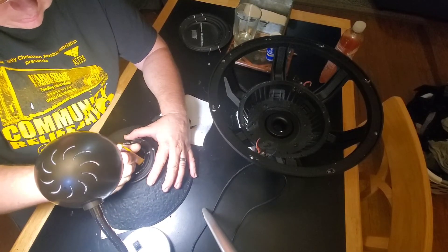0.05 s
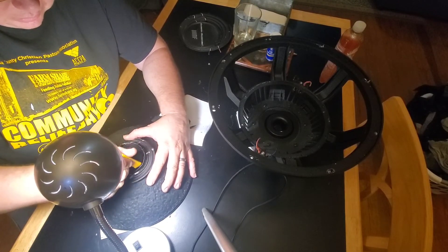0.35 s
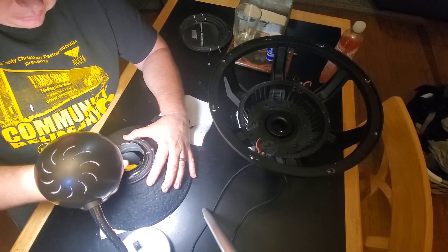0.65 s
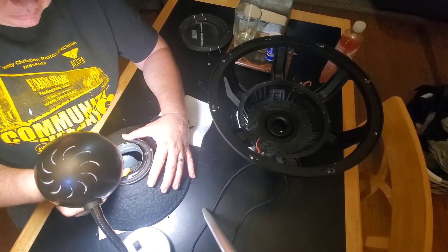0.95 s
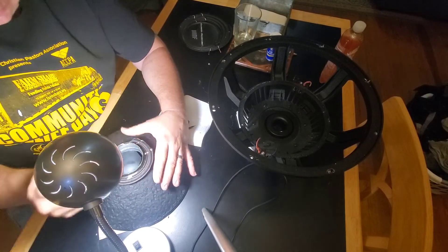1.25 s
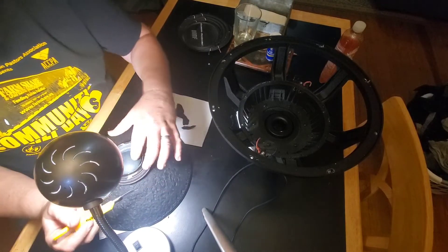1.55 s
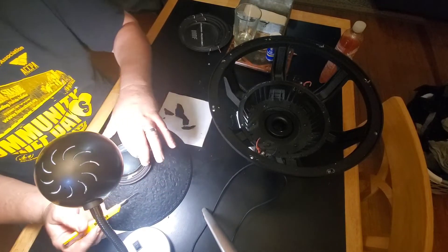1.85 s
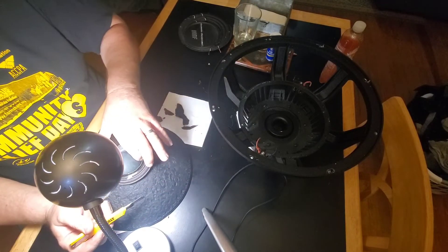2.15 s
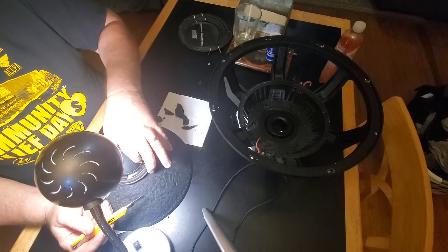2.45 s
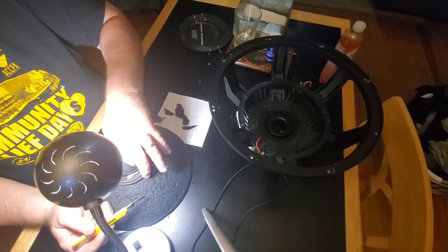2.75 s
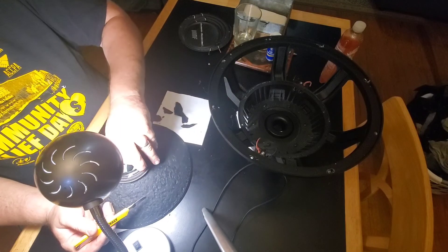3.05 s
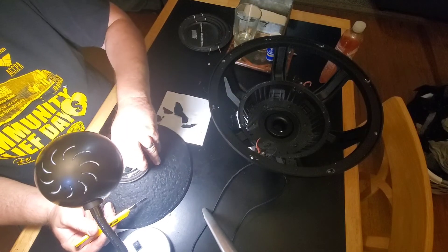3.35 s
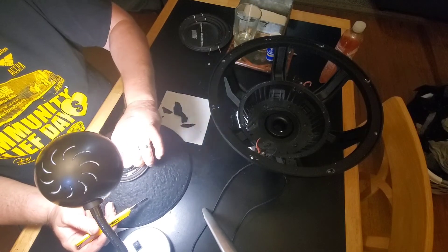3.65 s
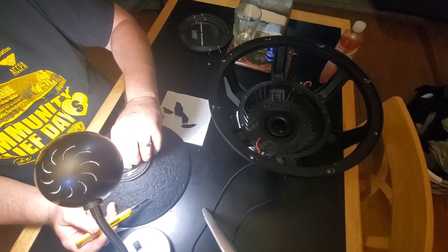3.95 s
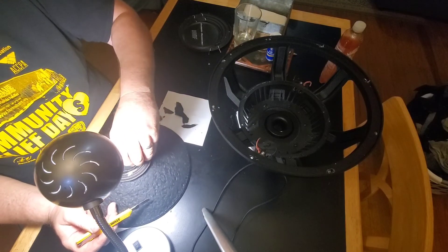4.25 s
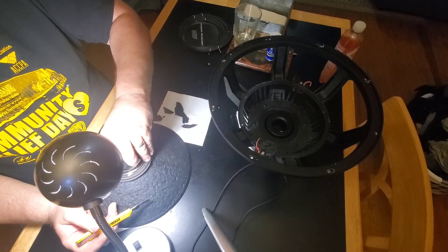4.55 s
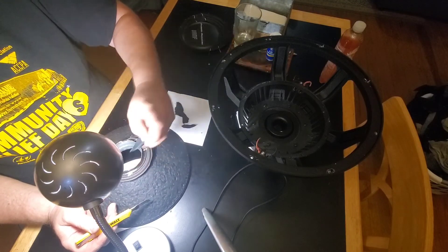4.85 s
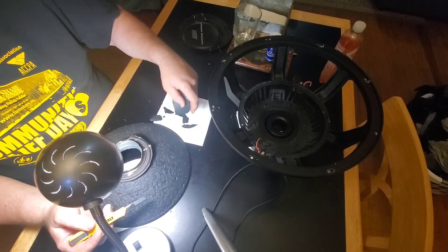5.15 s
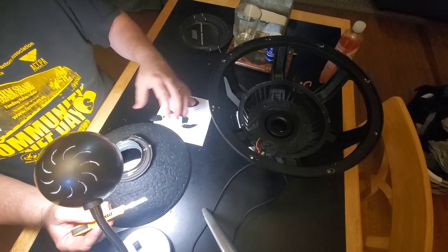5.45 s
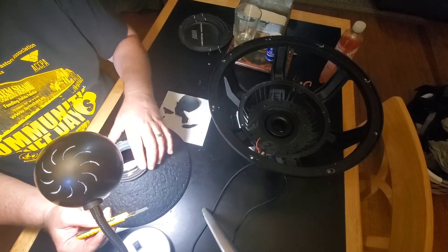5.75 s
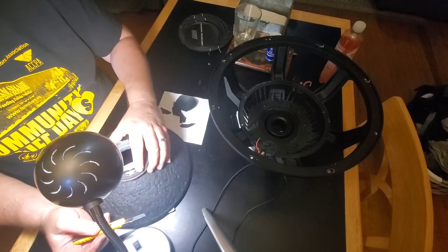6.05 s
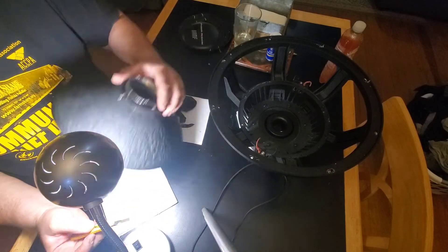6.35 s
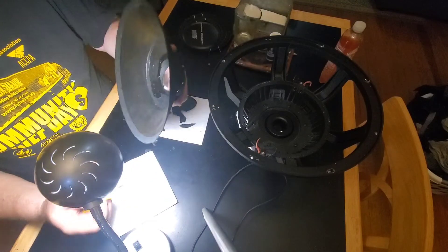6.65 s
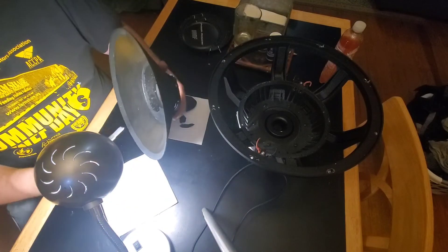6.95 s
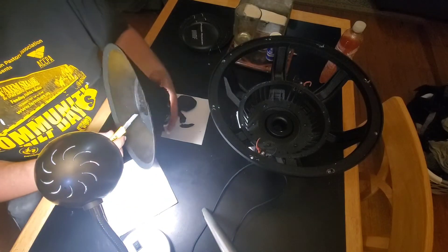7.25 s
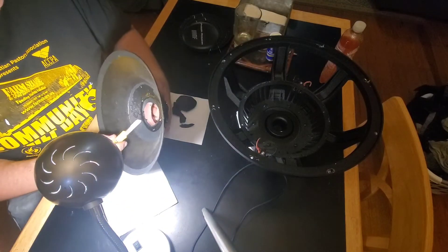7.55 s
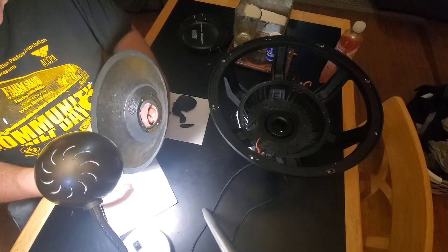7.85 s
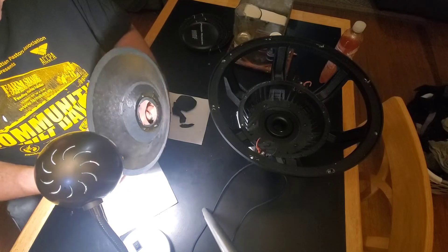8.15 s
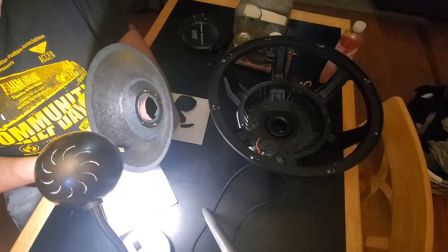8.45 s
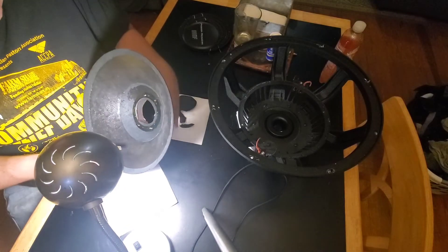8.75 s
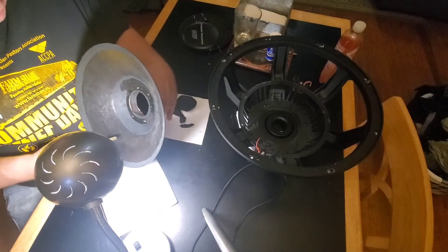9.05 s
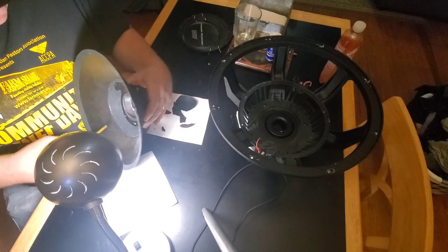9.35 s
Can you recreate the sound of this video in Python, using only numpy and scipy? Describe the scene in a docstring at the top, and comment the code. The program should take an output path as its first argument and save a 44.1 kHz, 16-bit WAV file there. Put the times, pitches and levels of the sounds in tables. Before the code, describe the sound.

A paper speaker cone is picked, rubbed and scratched by hand on a table, ending with a few light taps.

```python
"""A loose paper speaker cone is worked on by hand at a table, over the low rumble of a small room. First it
lies face down and is cut, picked and rubbed: stick-slip friction and sharp catches drive its hollow low body,
rasping upper modes and hissing fibres, with brief squeaks and thumps on the table. Near six seconds it is
lifted and scratched, and rings higher; for a moment its rim rests on the table. It ends with four light,
pitched taps as the tilted cone's rim knocks on the table."""
import sys
import numpy as np
from scipy import signal
from scipy.fft import rfft, irfft
from scipy.io import wavfile
from scipy.ndimage import uniform_filter1d

SR = 44100
rng = np.random.default_rng(int(sys.argv[2]) if len(sys.argv) > 2 else 0)


def materialize(psi):
    """Save the field psi as 16-bit PCM at rate SR to the path in sys.argv[1].

    A 1-D psi becomes a single channel; in a 2-D psi each row is a channel.
    """
    bounded = np.clip(np.atleast_2d(psi).T, -1, 1)
    quanta = np.round(bounded * 32767).astype(np.int16)
    wavfile.write(sys.argv[1], SR, quanta)


N = 423360
TIME = np.arange(N) / SR
FILTER_SIZE = 8192
HZ = np.maximum(np.fft.rfftfreq(FILTER_SIZE, 1 / SR), 1)
LIFT_S = 5.85   # the cone leaves the table
BODY, RASP, FIBRES = 0, 1, 2   # the cone's low, middle and high registers

# Broad tone of the cone pressed under the blade, lying under the fingers, held in the air,
# and tilted with its rim on the table: frequency_hz, level_db
PRESSED = [(150, -10), (250, -4.5), (450, -1.5), (650, -12), (1000, -15), (1600, -16.5), (2700, -18),
           (4000, -21.5), (7500, -28.5), (15500, -31.5)]
RUBBED = [(200, -6), (440, -3.5), (630, -12), (820, -15), (1150, -12.5), (1900, -13), (2500, -18.5),
          (6500, -16), (10500, -16), (15500, -19.5)]
LIFTED = [(150, -16), (300, -13), (600, -9), (1000, -1), (1500, -2.5), (1850, -2.5), (2450, -14),
          (3400, -13), (5500, -19), (7500, -26.5), (15500, -23.5)]
TILTED = [(150, -5.5), (620, -3), (820, -2.5), (1500, -2.5), (3600, -11), (5500, -23.5), (9000, -30)]
# Resonances on top of those four tones: pitch_hz, width_hz, boost_db
PRESSED_MODES = [(258, 110, 10), (340, 33, 3.9), (524, 23, 6.6), (907, 43, 7.6), (3644, 300, 3.7),
                 (9700, 230, 1.3)]
RUBBED_MODES = [(369.5, 22, 4), (477, 67, 3.6), (967, 150, 5.6), (2830, 530, 2), (3710, 1000, 7.1)]
LIFTED_MODES = [(433, 52, 6.4), (709, 51, 2.9), (1305, 110, 5.5), (1470, 72, 10.2), (2850, 255, 10.9),
                (3670, 230, 8.7)]
TILTED_MODES = [(549, 21, 3.7), (1040, 210, 7), (2030, 330, 6), (2720, 120, 11)]
# Dull bumps of hand and cone on the table: start_s, level_db, hardness_db_per_octave
BUMPS = [(0.181, -34.5, -7), (0.241, -48, -7), (0.757, -52.5, 10.5), (1.053, -46.5, 1), (1.365, -54.5, 7),
         (3.794, -45.5, -6.5), (4.623, -46, -1), (6.556, -56, 13), (6.717, -49, 3.5), (9.405, -46, -5.5)]
BUMP_PIVOT_HZ = 100   # hardness tilts a bump's spectrum about this pitch


def from_db(db):
    """Decibels to gain."""
    return 10 ** (np.asarray(db) / 20)


def unit_energy(x):
    """Scale so that the squares sum to one."""
    return x / np.sqrt(np.sum(x ** 2, axis=-1, keepdims=True) + 1e-20)


def colour(points):
    """An EQ curve in dB, drawn through a few points."""
    hz, db = np.transpose(points)
    return np.interp(np.log(HZ), np.log(hz), db)


def causal(db):
    """Minimum-phase impulse response of an EQ curve: nothing rings before the blow."""
    cepstrum = irfft(np.log(from_db(db) + 1e-6))
    cepstrum[1:FILTER_SIZE // 2] *= 2
    cepstrum[FILTER_SIZE // 2 + 1:] = 0
    return irfft(np.exp(rfft(cepstrum)))


def through(x, response):
    """Pass a sound through an impulse response."""
    return signal.fftconvolve(x, response)[:N]


def drift(rate_hz):
    """A random wander with a spread of about one."""
    return np.interp(TIME * rate_hz, np.arange(N // 20), rng.standard_normal(N // 20))


def diffuse(size, port_span_s=0.00057):
    """Noise from all sides at two microphone ports: alike in the bass, unrelated in the treble."""
    left, other = rfft(rng.standard_normal((2, size)))
    alike = np.sinc(2 * np.fft.rfftfreq(size, 1 / SR) * port_span_s)
    return irfft([left, alike * left + np.sqrt(1 - alike ** 2) * other], size)


def room_tone(rumble_trim_db, air_db, own_share):
    """Low rumble and the faint hiss of a quiet room, each partly different at the two ports."""
    # Rise and fall of the rumble: time_s, level_db
    rumble_levels = [(0.0, -54.5), (2.35, -72.5), (4.04, -66), (6.44, -74), (6.71, -65.5), (7.11, -78.5),
                     (7.94, -65.5), (9.01, -72), (9.6, -58)]
    # Tone of the rumble and of the hiss: frequency_hz, level_db
    rumble_colour = [(20, -19), (35, -9.5), (50, 1), (65, 0), (85, -18), (117, -7.5), (165, -14.5),
                     (210, -24.5), (400, -47)]
    air_colour = [(150, -9.5), (346, -15), (860, -14.5), (1940, -22.5), (5000, -30), (6500, -23),
                  (7600, -32.5), (12000, -26.5)]

    def noise(points):
        white = (diffuse(N) + own_share * rng.standard_normal((2, N))) / np.hypot(1, own_share)
        return np.array([through(side, unit_energy(causal(colour(points)))) for side in white])
    rumble_db = np.interp(TIME, *np.transpose(rumble_levels)) + rumble_trim_db
    return from_db(rumble_db) * noise(rumble_colour) + from_db(air_db) * noise(air_colour)


def slips(per_s, spread_db, smooth):
    """Stick-slip force: tiny uneven releases over smooth friction, held at steady power by the push."""
    sizes = from_db(spread_db * np.minimum(rng.exponential(1, N), 4)) * rng.choice([-1, 1], N)
    grains = unit_energy(sizes * (rng.random(N) < per_s / SR)) * np.sqrt(N)
    force = np.sqrt(1 - smooth) * grains + np.sqrt(smooth) * rng.standard_normal(N)
    return force / np.sqrt(uniform_filter1d(force ** 2, size=1024) + 1e-6)


def strokes(register, edge_db=11, flatness=1.6):
    """Rubbing envelope: each stroke speeds up and slows down over the touch of the resting hand."""
    # Finger or blade slides over the paper: middle_s, length_s, body_db, rasp_db, fibres_db
    slides = [(0.004, 0.011, -26.5, -37, -42), (0.06, 0.063, -35, -42.5, -44.5),
              (0.413, 0.029, -43, -53.5, -54.5), (0.578, 0.029, -43.5, -51, -51),
              (0.656, 0.01, -55, -68, -56), (1.534, 0.21, -71, -70.5, -76), (1.939, 0.16, -58.5, -81, -76),
              (2.561, 0.044, -67, -67.5, -62.5), (2.615, 0.55, -70.5, -81.5, -72),
              (2.803, 0.029, -59.5, -61, -66), (2.858, 0.1, -69, -64.5, -58.5),
              (2.93, 0.028, -61.5, -58, -73), (3.11, 0.073, -77, -61.5, -71.5),
              (3.205, 0.056, -57, -58.5, -51), (3.425, 0.047, -62, -61.5, -66),
              (3.513, 0.058, -62, -59.5, -69), (3.612, 0.051, -50, -53, -70),
              (3.787, 0.013, -66, -47.5, -55), (3.842, 0.058, -48, -59, -48.5),
              (3.991, 0.085, -55, -58, -54.5), (4.097, 0.1, -54, -65, -66),
              (4.16, 0.062, -50.5, -52, -56.5), (4.353, 0.09, -61.5, -76, -65),
              (4.496, 0.095, -50.5, -64.5, -56), (4.646, 0.084, -53, -53, -50.5),
              (4.834, 0.23, -77.5, -93, -61.5), (5.111, 0.071, -80.5, -80.5, -69),
              (5.35, 0.11, -77, -83, -71), (5.934, 0.056, -60.5, -61, -71),
              (6.078, 0.11, -62.5, -66, -70.5), (6.23, 0.067, -72, -56, -67),
              (7.229, 0.067, -83.5, -63.5, -72), (7.543, 0.06, -78.5, -57.5, -64),
              (7.786, 0.062, -90, -51.5, -54), (8.157, 0.041, -52, -59, -53), (8.287, 0.057, -63, -78, -71),
              (8.409, 0.052, -74, -65, -71), (8.784, 0.11, -88, -62, -58), (8.831, 0.047, -74, -58, -85),
              (8.924, 0.062, -78, -56, -59.5)]
    # The hand resting on the cone between strokes: time_s, level_db
    resting = [(0, -46.5), (.4, -55), (.68, -87), (.98, -59), (1.3, -75), (2.3, -81), (3.3, -70),
               (3.85, -67.5), (4.35, -81), (5.8, -92), (6.75, -81.5), (7.05, -96), (8.3, -74.5),
               (9.1, -81.5), (9.6, -62)]
    lying_db, lifted_db = (1.5, -5, -9), (-5, 1.5, -6)   # its share in body, rasp and fibres
    touch_db = np.where(TIME < LIFT_S, lying_db[register], lifted_db[register])
    power = from_db(np.interp(TIME, *np.transpose(resting)) + touch_db) ** 2
    for middle, length, *levels in slides:
        span = slice(*np.searchsorted(TIME, [middle - 2 * length, middle + 2 * length]))
        from_middle = np.abs(TIME[span] - middle) / (length / 2)
        power[span] += from_db(levels[register] - edge_db * from_middle ** flatness) ** 2
    return np.sqrt(power)


def cone_response(broad, modes, ring, sheen_db, low_hz, high_hz):
    """Ring of the paper cone within one band, with unit energy."""
    peaks = ring * sum(db / (1 + (2 * (HZ - hz) / width) ** 2) for hz, width, db in modes)
    sheen = sheen_db / (1 + (7400 / HZ) ** 4)   # high shelf: the hiss of the finest fibres
    edges = -10 * np.log10((1 + (low_hz / HZ) ** 14) * (1 + (HZ / high_hz) ** 14))
    return unit_energy(causal(colour(broad) + peaks + sheen + edges))


def cone(register, friction, crumble, rub_db, catch_db, snap_s):
    """Strokes and catches drive one register of the cone, whose modes change with the way it is held."""
    # How it is held: start_s, tone, resonances, ring_share left by the hand, low_cut_hz, sheen_db
    holds = [(0, PRESSED, PRESSED_MODES, 1, 190, 0), (.6, PRESSED, PRESSED_MODES, 1, 300, 2.5),
             (1.2, PRESSED, PRESSED_MODES, 1, 270, 0), (1.3, RUBBED, RUBBED_MODES, 1, 160, -2),
             (3.7, RUBBED, RUBBED_MODES, 1, 230, 4), (4.95, PRESSED, PRESSED_MODES, 1, 150, 8),
             (LIFT_S, LIFTED, LIFTED_MODES, .8, 130, 3), (6.45, TILTED, TILTED_MODES, 1, 130, 1),
             (7.1, LIFTED, LIFTED_MODES, 1, 240, 1.5)]
    low_hz, high_hz = [(0, 700), (700, 2800), (2800, SR / 2)][register]
    force = from_db(rub_db) * friction * strokes(register)
    force += from_db(catch_db) * catches(register, crumble, snap_s)
    current_hold = np.searchsorted([row[0] for row in holds], TIME, side="right") - 1
    out = np.zeros(N)
    for k, (_, broad, modes, ring, low_cut_hz, sheen_db) in enumerate(holds):
        response = cone_response(broad, modes, ring, sheen_db, max(low_hz, low_cut_hz), high_hz)
        out += through(force * (current_hold == k), response)
    return out


def moving_contact(x, patchy_db, spots=6):
    """The finger travels over the cone, and each spot favours other modes."""
    knots = np.log(np.geomspace(500, SR / 2, num=40))
    position = np.cumsum(8 + 2 * drift(rate_hz=2)) / SR   # about eight spots a second
    out = 0
    for k in range(spots):
        nearness = np.maximum(1 - np.abs((position - k) % spots - spots / 2), 0)
        favour_db = patchy_db * np.clip(rng.standard_normal(len(knots)), -2, 2)
        out = out + through(x * nearness, causal(np.interp(np.log(HZ), knots, favour_db)))
    return out


def squeaks(hoarse, waver_hz, glide_octaves):
    """Friction locks onto one mode for a moment: a hoarse, rising tone that wavers, swells and fades."""
    # Squeaks of the paper: middle_s, pitch_hz, level_db, length_s
    locks = [(0.061, 3570, -47.5, 0.12), (2.159, 402, -69.5, 0.31), (2.553, 3910, -65, 0.048),
             (3.194, 3620, -55, 0.047), (3.982, 990, -52, 0.058), (5.544, 598, -74, .1),
             (5.62, 724, -80, 0.12), (6.173, 1470, -57, 0.058), (7.782, 1425, -52.5, 0.061),
             (8.555, 2820, -54, 0.041), (9.18, 1400, -52.5, 0.035)]
    out = np.zeros(N)
    for middle, hz, db, length in locks:
        size = int(length * SR)
        pitch = hz * 2 ** (glide_octaves * np.linspace(-.5, .5, size))
        lowpass = signal.butter(2, waver_hz + hz * hoarse, fs=SR, output="sos")
        waver = signal.sosfilt(lowpass, rng.standard_normal((2, SR // 2)))[:, -size:]
        phase = 2 * np.pi * np.cumsum(pitch) / SR
        tone = waver[0] * np.cos(phase) + waver[1] * np.sin(phase)
        at = int((middle - length / 2) * SR)
        out[at:at + size] += from_db(db) * unit_energy(tone * np.hanning(size)) * np.sqrt(size / 2)
    return out


def catches(register, crumble, snap_s):
    """Blade or nail catches and lets go: one sharp release, then a swelling, dying crumble of slips."""
    # Snags in the paper: start_s, body_db, rasp_db, fibres_db, drag_s
    snags = [(0.1289, -28, -35, -30, 0.0037), (0.141, -29, -35.5, -39, 0.034),
             (0.1838, -24.5, -63, -66, 0.00034), (0.239, -32, -40, -50, 0.0071),
             (0.251, -31.5, -48, -42.5, 0.0075), (0.496, -80, -58, -54.5, 0.0067),
             (0.544, -69, -60, -58, 0.0083), (0.713, -53, -54.5, -64, 0.015),
             (0.757, -33.5, -47.5, -54, 0.0076), (0.783, -40.5, -50, -56.5, 0.022),
             (0.843, -35, -53.5, -62.5, 0.0044), (1.0516, -31, -45, -50, 0.0065),
             (1.094, -45, -53, -50.5, 0.0068), (1.118, -34, -46, -64, 0.004),
             (1.2186, -42.5, -74, -71, 0.0038), (1.361, -50, -50.5, -67, 0.031),
             (2.331, -58.5, -66.5, -66, 0.025), (3.547, -45, -56.5, -73, 0.0037),
             (3.572, -53.5, -54, -67.5, 0.0039), (3.729, -47.5, -65, -74, 0.031),
             (3.797, -42.5, -49, -65, 0.0029), (3.927, -42.5, -61, -83, 0.012),
             (4.615, -40, -53, -45, 0.016), (4.621, -49, -61, -47, 0.0011),
             (5.309, -91, -85, -65.5, 0.0035), (5.354, -64, -87, -82, 0.023),
             (5.919, -70, -64.5, -73, .005), (6.166, -66, -54, -70.5, 0.025),
             (6.516, -50, -46.5, -49.5, 0.029), (6.655, -56, -49.5, -58, 0.0098),
             (6.67, -47, -52, -66, 0.0071), (6.715, -47, -55.5, -61.5, 0.023),
             (7.42, -72, -64.5, -74, 0.0075), (7.94, -35.5, -33, -44.5, 0.0048),
             (7.948, -36, -38.5, -63, 0.037), (7.956, -42, -46, -55, 0.00048),
             (8.047, -45, -40, -61, 0.0035), (8.06, -40, -38, -59, 0.028),
             (8.09, -49.5, -45.5, -60, 0.0028), (8.121, -41.5, -43, -55, 0.0034),
             (8.186, -50, -53.5, -59, 0.0015), (8.199, -57, -75, -61, 0.00068),
             (8.478, -73, -51.5, -60.5, 0.0071), (8.518, -64, -52, -61, 0.0089),
             (8.545, -63, -56.5, -48.5, 0.0063), (8.564, -72, -62, -67, 0.0053),
             (9.175, -70, -64.5, -76.5, .004), (9.285, -57.5, -68, -93, 0.029)]
    force, age = np.zeros(N), TIME[:SR // 4]
    for start, *levels, drag in snags:
        at = int(start * SR)
        swell = np.exp(-age / drag) - np.exp(-10 * age / drag)
        burst = crumble[at:at + len(age)] * swell[:N - at]
        burst[0] += np.sqrt(snap_s * SR * np.exp(-drag / 0.012))   # a long drag starts with little snap
        burst = unit_energy(burst) * np.sqrt(SR / 50)   # the energy of 20 ms at unit power
        force[at:at + len(burst)] += from_db(levels[register]) * burst
    return force


def struck_modes(modes, hardness, pivot_hz, age):
    """Decaying sines of alternating sign; a harder blow favours the higher ones."""
    ring = np.zeros(len(age))
    for k, (hz, db, t60) in enumerate(modes):
        envelope = from_db(db + hardness * np.log2(hz / pivot_hz) - 60 * age / t60)
        ring += envelope * np.sin(2 * np.pi * hz * age) * (-1) ** k
    return ring


def table_thumps():
    """Bumps set the low modes of the table top ringing."""
    # Modes of the table top: pitch_hz, level_db, t60_s
    table_modes = [(49.3, -11, 0.57), (65.1, -3.5, 0.56), (87.5, -10.5, 0.37), (112.8, -8, 0.854),
                   (162.3, 0.5, 0.33), (198, -10.5, 0.15)]
    out, age = np.zeros(N + SR), TIME[:SR]
    for start, db, hardness in BUMPS:
        thump = struck_modes(table_modes, hardness, BUMP_PIVOT_HZ, age)
        out[int(start * SR):][:SR] += from_db(db) * thump
    return out[:N]


def stand_shake(level_db, hz, width, t60_s):
    """Each bump also shakes the microphone stand: a low shudder, different at each port."""
    swing, age = np.zeros(N + SR), TIME[:SR]
    for start, db, hardness in BUMPS:
        onset_db = level_db + db + hardness * np.log2(hz / BUMP_PIVOT_HZ)
        swing[int(start * SR):][:SR] += from_db(onset_db - 60 * age / t60_s)
    band = signal.butter(2, [hz * (1 - width), hz * (1 + width)], "band", fs=SR, output="sos")
    shudder = signal.sosfilt(band, rng.standard_normal((2, N)))
    return swing[:N] * shudder / shudder.std()


def cone_taps(level_db, crack_db, crack_s):
    """Clean taps of the tilted cone's rim on the table: a brief papery crack, and the same pitches ringing
    every time."""
    # The closing taps: start_s, level_db, hardness_db_per_octave
    taps = [(9.3946, -37, 0), (9.4587, -42.5, 3), (9.561, -44, 0.5), (9.59, -45, 3)]
    # Modes of the tapped cone: pitch_hz, level_db, t60_s
    tapped_modes = [(392, -7.5, 0.13), (522, -9, 0.23), (810, -17, .1), (1084, -4.5, 0.092),
                    (1270, 3, 0.089), (1455, 5.5, 0.041), (1760, -1.5, .05), (2350, -4, .05),
                    (2715, -8, .06), (3840, -6.5, 0.023)]
    out, age = np.zeros(N + SR), TIME[:SR // 2]
    paper = cone_response(TILTED, TILTED_MODES, ring=0, sheen_db=0, low_hz=240, high_hz=SR / 2)
    for start, db, hardness in taps:
        ring = struck_modes(tapped_modes, hardness, pivot_hz=1260, age=age)
        burst = rng.standard_normal(len(age)) * np.exp(-age / crack_s)
        crack = from_db(crack_db) * through(burst, paper)[:len(age)]
        out[int(start * SR):][:len(age)] += from_db(level_db + db) * (ring + crack)
    return out[:N]


def reflections(decay):
    """One pattern of dense echoes at the two ports, with an even overall colour."""
    echoes = rfft(diffuse(len(decay)) * decay)
    power = uniform_filter1d(np.mean(np.abs(echoes) ** 2, axis=0), size=40)
    audible = decay > decay.max() / 1000
    return irfft(echoes * np.sqrt(np.sum(decay ** 2) / power), len(decay)) * audible


def room(x, early_db, early_t60, late_db, late_t60, port_lag_s=0.0002):
    """Direct sound reaches the left port first; echoes off table and walls change as the hands move."""
    age = TIME[:SR * 2 // 3]
    early = from_db(early_db) * unit_energy(from_db(-60 * age / early_t60))
    late = from_db(late_db) * unit_energy(from_db(-60 * age / late_t60))
    decay = np.hypot(early, late) * np.clip(age / 0.0068, 0, 1) ** 2   # echoes take a moment to build
    direct = np.array([x, np.pad(x, (round(port_lag_s * SR), 0))[:N]])
    position = np.cumsum(1 + drift(rate_hz=2)) * np.pi / SR   # glides between two echo patterns
    echoes = sum(np.array([through(x * share, side) for side in reflections(decay)])
                 for share in (np.cos(position), np.sin(position)))
    return (direct + echoes) / np.sqrt(1 + np.sum(decay ** 2))


def microphone_ports(left, right):
    """The two ports colour the sound differently: the high treble leans to the left."""
    # Stereo balance: frequency_hz, left_minus_right_db
    balance = [(700, 1.2), (1300, 1.5), (2400, -1.5), (5000, 1.5), (8000, 8), (12000, 8), (15500, 0)]
    lean_db = colour(balance) / 2
    return np.array([through(left, causal(lean_db)), through(right, causal(-lean_db))])


def scene():
    """Cone and table in the room, heard through the two ports."""
    grip = from_db(3.3 * drift(rate_hz=60))   # the finger grips and slides unevenly
    rubbing = grip * slips(per_s=950, spread_db=4.5, smooth=0.24)
    scraping = grip * slips(per_s=330, spread_db=3.5, smooth=0.08)
    friction = np.where(TIME < LIFT_S, rubbing, scraping)   # the blade skips over the lifted cone
    brushing = grip * slips(per_s=1200, spread_db=5.0, smooth=0.43)
    brushing = np.where(TIME < LIFT_S, brushing, (brushing + scraping) / np.sqrt(2))
    crumble = slips(per_s=1200, spread_db=2.5, smooth=0.24)

    body = cone(BODY, friction, crumble, rub_db=-1.0, catch_db=-1.02, snap_s=0.0036)
    rasp = cone(RASP, friction, crumble, rub_db=0.38, catch_db=3.5, snap_s=0.0023)
    fibres = cone(FIBRES, brushing, crumble, rub_db=-1.4, catch_db=2.5, snap_s=0.00047)
    rasp, fibres = moving_contact(rasp, patchy_db=2.5), moving_contact(fibres, patchy_db=2.5)

    sound = room(body + table_thumps(), early_db=-2.5, early_t60=0.16, late_db=-5.0, late_t60=0.36)
    squeaking = squeaks(hoarse=0.03, waver_hz=35, glide_octaves=0.06)
    sound += room(rasp + squeaking, early_db=3.5, early_t60=0.098, late_db=-2.5, late_t60=0.36)
    sound += room(fibres, early_db=-2.0, early_t60=0.18, late_db=-2.0, late_t60=0.3017)
    tapping = cone_taps(level_db=2.1, crack_db=1.0, crack_s=0.011)
    sound += room(tapping, early_db=-1.5, early_t60=0.25, late_db=-5.0, late_t60=0.3)
    shudder = stand_shake(level_db=-9.0, hz=50.3, width=0.12, t60_s=0.72)
    ambience = room_tone(rumble_trim_db=2.5, air_db=-75.5, own_share=0.49)
    return microphone_ports(*sound) + shudder + ambience


def record(dry):
    """A steep low-pass cuts the top above 15.8 kHz."""
    return signal.sosfilt(signal.ellip(10, .1, 80, 15800, fs=SR, output="sos"), dry)


dry = scene()
out = record(dry)
materialize(out)
```